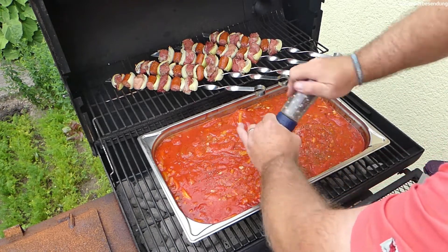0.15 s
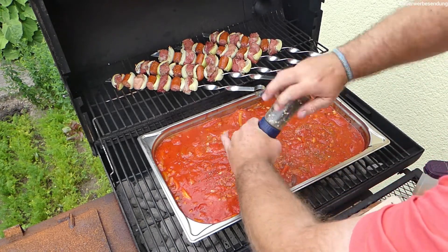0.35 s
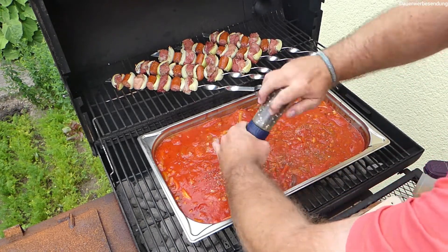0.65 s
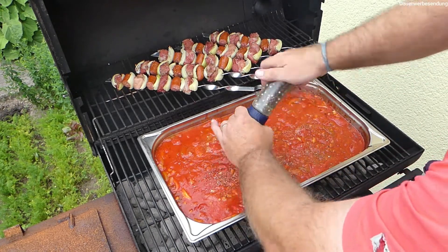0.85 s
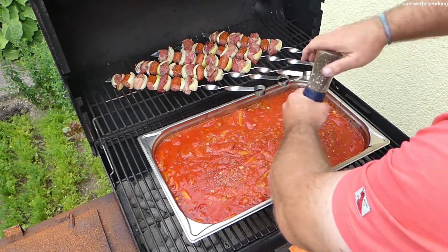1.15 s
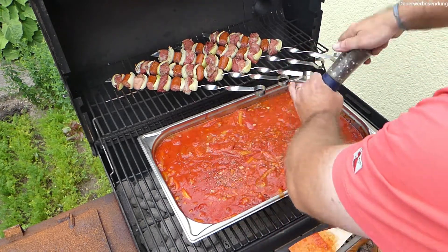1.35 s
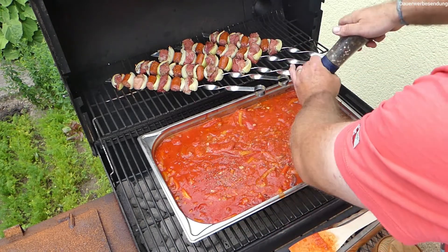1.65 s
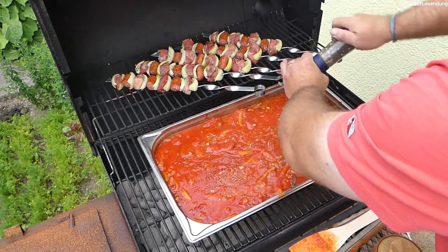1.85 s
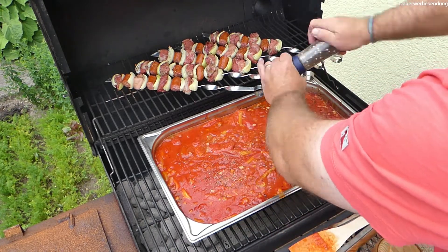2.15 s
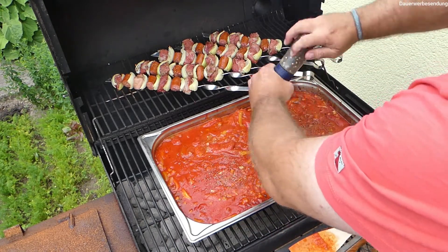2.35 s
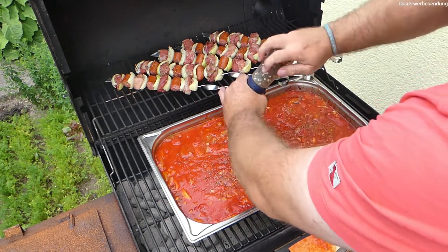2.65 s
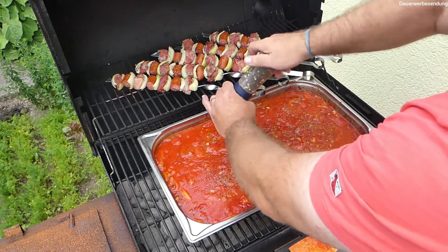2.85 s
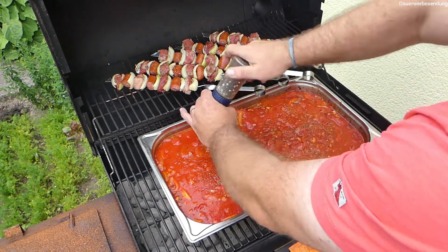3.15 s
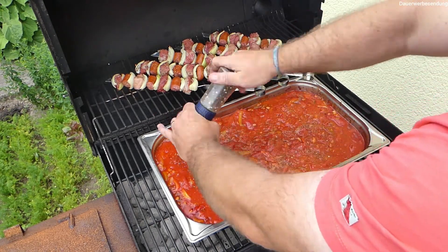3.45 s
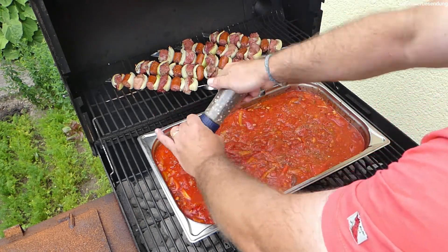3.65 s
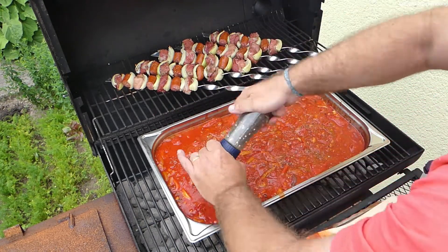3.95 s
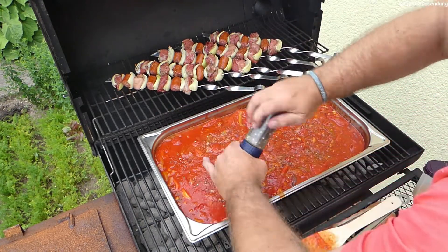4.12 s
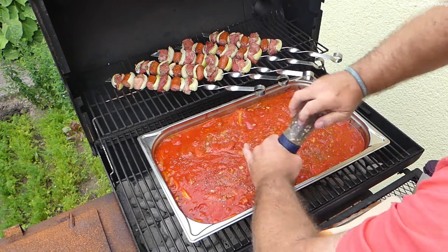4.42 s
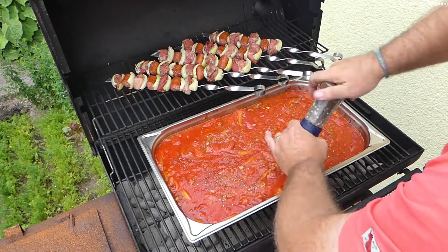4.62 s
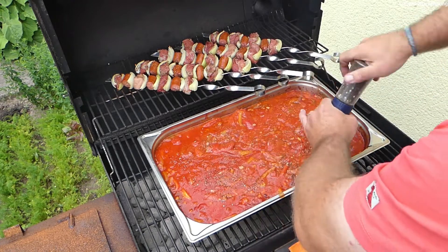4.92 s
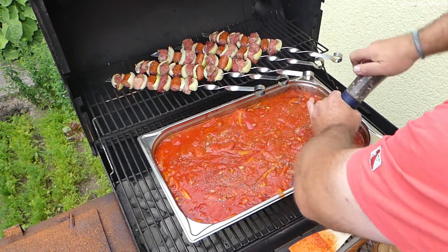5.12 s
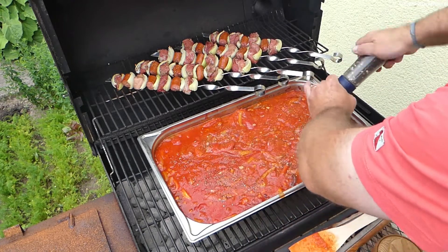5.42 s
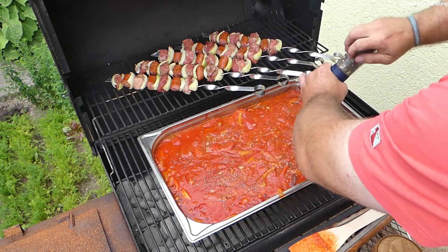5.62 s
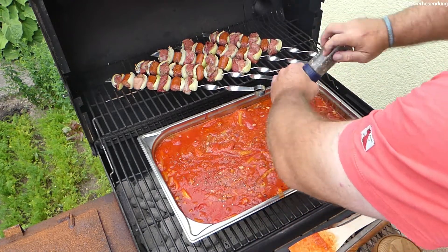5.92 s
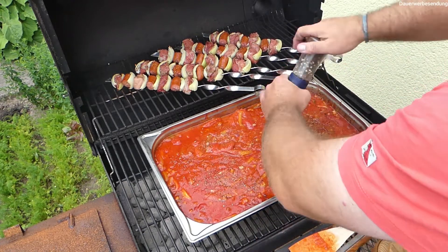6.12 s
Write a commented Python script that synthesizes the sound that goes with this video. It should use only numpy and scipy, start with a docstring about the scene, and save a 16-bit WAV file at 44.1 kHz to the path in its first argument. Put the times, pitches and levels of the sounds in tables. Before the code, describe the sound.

Steady run of about twenty-two quick pepper mill twists, each a dry scratchy burst just over a tenth of a second long, with uneven surges of grit. Crisp snaps and a hollow plastic crunch colour the stronger twists; small ticks and rattles fill the gaps. Close, nearly centred and dry, with a very short reflection from the steel hood, over a quiet outdoor bed of low rumble, hiss and breathy burner hum.

```python
"""At an outdoor grill, a hand pepper mill is twisted three to four times a second over a steel tray.
Corns crushed between the burrs make dense bright grit: noise gated by many small breaks, and ringing splinters.
Under load the plastic barrel crunches through its modes; single corns crack and the palm thuds on the cap.
Loose corns rattle between twists, faint whistles fall in the treble, and the steel hood answers briefly.
A gas burner hums softly, as resonant noise, under the rumble and hiss of the open air."""
import sys
import numpy as np
from scipy import signal
from scipy.fft import rfft, irfft, next_fast_len
from scipy.io import wavfile
from scipy.ndimage import uniform_filter1d, map_coordinates

SR = 44100
rng = np.random.default_rng(int(sys.argv[2]) if len(sys.argv) > 2 else 0)


def file_out(sig):
    """Save sig as 16-bit WAV at sys.argv[1]."""
    # one column per channel
    cols = np.atleast_2d(sig).T
    # limit, then scale
    lim = np.clip(cols, -1, 1)
    pcm = np.round(lim * 32767).astype(np.int16)
    wavfile.write(sys.argv[1], SR, pcm)


def linear_from_db(decibels):
    """Turn decibels (scalar or array-like) into linear amplitude factors; 0 gives 1."""
    return 10 ** (np.asarray(decibels, float) / 20)


N = 276939


def unit(x):
    """Scaled to rms 1."""
    return x / np.sqrt(np.mean(x ** 2) + 1e-20)


def along(points, hz):
    """Reads (Hz, value) points at any frequency, on a log axis."""
    point_hz, value = np.transpose(points)
    return np.interp(np.log(hz + 1), np.log(point_hz + 1), value)


def curves(rows):
    """One value per sample for each column after the time."""
    s, *columns = np.transpose(sorted(rows))
    return [np.interp(np.arange(N) / SR, s, column) for column in columns]


def wobble(rate):
    """A smooth random curve, rate knots a second."""
    knots = rng.standard_normal(N // 16)
    return map_coordinates(knots, [np.arange(N) * rate / SR])


def filtered(x, response):
    """x times a complex response of frequency."""
    size = next_fast_len(N + SR // 2)
    spectrum = rfft(x, size) * response(np.fft.rfftfreq(size, 1 / SR))
    return irfft(spectrum, size)[..., :N]


def resonant(modes):
    """Causal response of a sum of resonances (Hz, width Hz, dB), alternating in sign."""
    def response(hz):
        total = 0
        for k, (centre, width, db) in enumerate(modes):
            mode = 1j * hz * width / (centre * centre - hz * hz + 1j * hz * width)
            total = total + (-1) ** k * linear_from_db(db) * mode
        return total
    return response


def grinding():
    """Grit follows the twist; the same uneven feed of corns shakes the barrel as load rises."""
    # pitches where splinters ring: centre_hz, spread_octaves, level_db (relative)
    splinter_bands = [(4310, 0.13, -8), (5630, 0.064, -4.5), (7640, 0.094, -4.5), (9200, 0.087, -1),
                      (11350, 0.12, -7)]
    # the burrs stick on a hard corn just before it cracks: time_s, drop_db
    sticking = [(3.302, 12), (4.222, 4), (5.108, 11)]
    stall_s = .008  # half-width of a dip, to 1/e of its drop in dB
    grit_level, crunch_level, note_hz = effort()

    feed_db = 1.0 * wobble(45) + 1.1 * wobble(130)
    t = np.arange(N) / SR
    for s, drop_db in sticking:
        feed_db = feed_db - drop_db * np.exp(-((t - s) / stall_s) ** 2)

    breaks = fractures(count=5000, spread_db=3, t60=0.011, bed=1.0)
    rub = unit(burrs(patchy(breaks, 2.38, size=12)))
    chips = np.zeros(N)
    for hz, octaves, db in splinter_bands:
        chips += linear_from_db(db) * splinters(2500, np.full(N, hz), octaves, cycles=5.1, spread_db=4)
    grit = unit(0.93 * rub + 0.48 * unit(chips))

    breaks = fractures(count=2000, spread_db=2.5, t60=0.012, bed=1.0)
    shake = unit(barrel(patchy(breaks, 3.5, size=24)))
    # the grip retunes the barrel
    note = splinters(3000, note_hz, octaves=0.045, cycles=4.5, spread_db=2)
    crunch = unit(0.84 * shake + 0.57 * note)
    return linear_from_db(feed_db) * (grit_level * grit + crunch_level * crunch)


def effort():
    """Grit, crunch and barrel note: each twist opens fast, carries its surges and load, and dies away."""
    # twists of the wrist: start_s, length_s, attack_s (per 10 dB), steady grit_db, steady crunch_db
    twist_rows = [(0.086, 0.137, 0.004, -30.4, -51.2), (0.385, 0.113, 0.015, -30.2, -51.2),
                  (0.658, 0.109, 0.006, -22.1, -33.1), (0.948, 0.123, 0.009, -27.2, -34.7),
                  (1.217, 0.118, 0.024, -26.1, -45.2), (1.48, 0.137, 0.006, -26.4, -33.4),
                  (1.803, 0.104, 0.014, -26.3, -37.2), (2.077, 0.117, 0.015, -24.5, -37.0),
                  (2.365, 0.137, 0.004, -24.7, -32.4), (2.686, 0.109, 0.011, -23.6, -34.8),
                  (2.971, 0.107, 0.006, -24.7, -32.1), (3.237, 0.121, 0.022, -30.4, -50.6),
                  (3.589, 0.096, 0.015, -29.2, -45.8), (3.848, 0.113, 0.007, -23.2, -38.3),
                  (4.143, 0.115, 0.006, -25.9, -34.9), (4.44, 0.108, 0.013, -25.3, -51.2),
                  (4.707, 0.155, 0.01, -27.2, -42.2), (4.994, 0.168, 0.037, -26.2, -42.5),
                  (5.319, 0.138, 0.015, -28.7, -51.2), (5.634, 0.115, 0.016, -25.2, -51.2),
                  (5.899, 0.123, 0.011, -22.9, -34.1), (6.191, 0.12, 0.019, -21.8, -37.4)]
    # a clump of corns goes through the burrs: time_s, grit_db (at full twist), slope_s (per 10 dB each side)
    surge_rows = [(0.123, -12.8, 0.024), (0.183, -15.6, 0.016), (0.399, -18.5, 0.017),
                  (0.469, -17.8, 0.023), (0.679, -17.1, 0.037), (0.762, -18.1, 0.015),
                  (0.976, -13.9, 0.031), (1.053, -17.4, 0.022), (1.228, -18.0, 0.023),
                  (1.276, -15.5, 0.033), (1.322, -15.8, 0.023), (1.532, -13.1, 0.042),
                  (1.604, -18.5, 0.022), (1.816, -20.7, 0.026), (1.897, -16.1, 0.021),
                  (2.103, -12.9, 0.036), (2.18, -18.8, 0.021), (2.382, -14.8, 0.034), (2.441, -19.8, 0.026),
                  (2.492, -19.5, 0.023), (2.694, -14.0, 0.018), (2.745, -20.3, 0.026),
                  (2.997, -19.9, 0.034), (3.066, -18.6, 0.033), (3.269, -16.6, 0.026),
                  (3.325, -15.9, 0.033), (3.647, -20.6, 0.025), (3.861, -15.2, 0.022),
                  (3.913, -17.5, 0.027), (4.156, -14.9, 0.035), (4.235, -19.9, 0.03), (4.447, -18.0, 0.031),
                  (4.531, -17.1, 0.022), (4.732, -14.2, 0.029), (4.779, -18.7, 0.024),
                  (4.836, -21.8, 0.032), (5.081, -14.2, 0.047), (5.154, -22.8, 0.02), (5.353, -11.9, 0.033),
                  (5.432, -17.5, 0.018), (5.649, -13.7, 0.03), (5.707, -17.0, 0.021), (5.924, -13.2, 0.03),
                  (6.005, -18.6, 0.03), (6.242, -19.1, 0.036)]
    # heaviest load of each twist on the barrel:
    # time_s, crunch_db (at full twist), rise_s and fall_s (per 10 dB), note_hz
    load_rows = [(0.185, -26.8, 0.092, 0.026, 1250), (0.469, -27.7, 0.066, 0.029, 1500),
                 (0.741, -28.9, 0.01, 0.021, 2100), (1.036, -29.2, 0.032, 0.08, 2200),
                 (1.347, -25.8, 0.098, 0.049, 1670), (1.602, -32.8, 0.066, 0.08, 2020),
                 (1.867, -30.7, 0.101, 0.08, 1930), (2.141, -27.1, 0.112, 0.069, 2380),
                 (2.466, -22, 0.02, 0.018, 2340), (2.752, -27.7, 0.096, 0.026, 2190),
                 (3.042, -29.3, 0.01, 0.08, 2070), (3.32, -26, 0.04, 0.051, 1950),
                 (3.627, -26.6, 0.014, 0.041, 2240), (3.922, -25.5, 0.025, 0.062, 2070),
                 (4.236, -21.4, 0.015, 0.006, 1400), (4.496, -27, 0.037, 0.08, 1700),
                 (4.8, -31, 0.112, 0.048, 1300), (5.113, -24.5, 0.031, 0.031, 1670),
                 (5.408, -29.8, 0.11, 0.08, 1900), (5.695, -23.5, 0.083, 0.03, 2230),
                 (5.978, -28.3, 0.014, 0.015, 2090), (6.268, -25.5, 0.044, 0.033, 1700)]
    # loose corns rattle as the hand regrips: time_s, grit_db, rise_s and fall_s (per 10 dB)
    rattle_rows = [(0.013, -43.5, 0.022, 0.018), (0.256, -25.3, 0.024, 0.018), (0.54, -35.4, 0.03, 0.036),
                   (0.638, -37.4, 0.021, 0.021), (0.848, -33.3, 0.054, 0.049), (0.906, -38.5, 0.029, 0.03),
                   (0.937, -36.8, 0.015, 0.01), (1.131, -21.2, 0.021, 0.03), (1.389, -23.3, 0.03, 0.018),
                   (1.457, -28.3, 0.015, 0.024), (1.681, -32.4, 0.024, 0.042), (1.78, -33.5, 0.04, 0.01),
                   (2.248, -36.2, 0.032, 0.046), (2.909, -35.3, 0.034, 0.024), (2.94, -33.1, 0.013, 0.021),
                   (3.143, -35.5, 0.01, 0.039), (3.428, -30.1, 0.011, 0.033), (3.5, -35.9, 0.018, 0.029),
                   (3.719, -38.7, 0.05, 0.028), (3.773, -34.8, 0.013, 0.018), (3.997, -38.3, 0.02, 0.025),
                   (4.111, -41.6, 0.015, 0.021), (4.384, -29.6, 0.035, 0.023), (4.613, -32.9, 0.019, 0.016),
                   (4.95, -36.3, 0.03, 0.04), (5.26, -35.0, 0.013, 0.03), (5.302, -34.8, 0.019, 0.02),
                   (5.489, -33.6, 0.02, 0.029), (5.562, -35.7, 0.023, 0.028), (5.605, -32.0, 0.025, 0.02),
                   (5.84, -37.4, 0.04, 0.02), (6.08, -38.5, 0.03, 0.029), (6.116, -39.0, 0.016, 0.022)]
    release_s = .0225  # per 10 dB after a twist
    rest_db, rattle_crunch_db = -49, -18  # grit at rest; crunch over loose grit
    bite_hz, loose_hz, loosen_s = 2200, 1600, .09  # note as the grip closes, once it opens; time to open

    start, length, attack, grit_db, crunch_db = np.transpose(twist_rows)
    full, never = np.zeros(len(start)), np.full(len(start), np.inf)
    opening = peaked(start, full, attack, never)
    closing = peaked(start + length, full, never, full + release_s)
    turning = opening * closing
    strongest = turning.max(axis=0)

    surge_s, surge_db, slope = np.transpose(surge_rows)
    load_s, load_db, rise, fall, load_hz = np.transpose(load_rows)
    surges = peaked(surge_s, surge_db, slope, slope).sum(axis=0)
    loads = peaked(load_s, load_db, rise, fall).sum(axis=0)
    loose = peaked(*np.transpose(rattle_rows)).sum(axis=0) + linear_from_db(rest_db) ** 2
    grit = linear_from_db(grit_db) ** 2 @ turning + strongest * surges + loose
    crunch = linear_from_db(crunch_db) ** 2 @ turning + strongest * loads + loose * linear_from_db(rattle_crunch_db) ** 2

    closed = [(s, bite_hz) for s in start]
    opened = [(s, loose_hz) for s in start + length + loosen_s]
    note_hz, = curves([*zip(load_s, load_hz), *closed, *opened])
    ms = np.arange(N) / SR * 1000
    grit_level, crunch_level = [np.interp(ms, np.arange(len(p)), np.sqrt(p)) for p in (grit, crunch)]
    return grit_level, crunch_level, note_hz


def peaked(s, db, rise, fall):
    """Power of one swell a row, straight in dB up to its peak and down again; rows x milliseconds."""
    late = np.arange(0, N / SR + .001, .001) - np.c_[s]
    down = np.maximum(-late / np.c_[rise], late / np.c_[fall])
    return linear_from_db(np.c_[db] - 10 * down) ** 2


def fractures(count, spread_db, t60, bed):
    """Noise gated by many small breaks of very unequal size, each dying fast, over a bed of rubbing."""
    when, size = rng.random(count), rng.exponential(size=count)
    strength = linear_from_db(spread_db * np.minimum(size, 5))  # rare giants are capped
    starts = np.bincount((when * N).astype(int), strength, N)
    t = np.arange(SR // 20) / SR
    gate = signal.fftconvolve(starts, linear_from_db(-60 * t / t60))[:N]
    return (bed + unit(gate)) * rng.standard_normal(N)


def patchy(x, depth_db, size):
    """Random gain patches over time and pitch: no two moments share one colour."""
    z = signal.stft(x, nperseg=128)[2]
    field = uniform_filter1d(rng.standard_normal(z.shape), 3, 0)  # across pitch
    field = uniform_filter1d(field, size, 1)  # across time
    return signal.istft(z * linear_from_db(depth_db * unit(field)), nperseg=128)[1][:N]


def splinters(count, centre_hz, octaves, cycles, spread_db):
    """Splinters of unequal size, each ringing briefly at its own pitch around a centre."""
    start = rng.integers(0, N, count)
    detune, size = rng.standard_normal(count), rng.exponential(size=count)
    hz = np.clip(centre_hz[start] * np.exp2(octaves * detune), 300, SR / 2.5)
    return unit(rings(start, hz, cycles, linear_from_db(spread_db * np.minimum(size, 4))))


def rings(start, hz, cycles, size):
    """Sum of short sines, one row per splinter, each fading by 1/e over the given cycles."""
    k = np.arange(160)
    turn = hz[:, None] * k / SR
    wave = size[:, None] * np.exp(-turn / cycles) * np.sin(2 * np.pi * turn)
    return np.bincount((start[:, None] + k).ravel(), wave.ravel(), N + len(k))[:N]


def burrs(x):
    """Colour of the grinding burrs."""
    # spectrum of the burrs: pitch_hz, level_db (relative, per Hz)
    colour = [(300, -75), (1650, -40.5), (2800, -18), (3240, -13), (3560, -9.5), (4210, -8), (4500, -6),
              (6200, -3.5), (6820, -4), (8930, -0.5), (11300, -5), (13800, -9), (15200, -13.5),
              (16000, -68)]
    return filtered(x, lambda hz: linear_from_db(along(colour, hz)))


def barrel(x):
    """The plastic barrel's modes; it is too small to radiate bass."""
    # modes of the barrel: centre_hz, width_hz, level_db (relative)
    modes = [(614, 370, -14), (1138, 240, -6), (1750, 450, -8.5), (2200, 216, -2.5), (2740, 520, -6)]
    return filtered(x, lambda hz: resonant(modes)(hz) * (1j * hz / (300 + 1j * hz)) ** 2)


def cracks():
    """Each crack is a broad burst through the burrs, a ring at its own pitch and a knock in the barrel."""
    # corns that crack or drop: time_s, level_db (relative), knock_db (over that level), ring pitch_hz
    crack_rows = [(0.084, -3, -21, 9830), (0.1804, -5, -20, 5720), (0.3277, -16, -35, 9000),
                  (0.396, -6, -21, 7600), (0.4525, -3, -9, 9900), (0.475, -8, -6, 6000),
                  (0.629, -13, -29, 11600), (0.6566, 0, -34, 9000), (0.7562, -5, -26, 8700),
                  (0.816, -5, -42, 9000), (0.854, -11, -34, 9970), (0.8949, -16, -27, 9400),
                  (0.9592, 0, -15, 8860), (1.0291, -6.5, -0.5, 8700), (1.1553, -7, -29, 9370),
                  (1.2221, 0, -35, 9060), (1.275, -6, -8, 6000), (1.4525, -9, -28, 8200),
                  (1.4775, -9, -17, 9200), (1.5264, -1, -30, 6360), (1.806, -2, -24, 8970),
                  (1.986, -18, -24, 9000), (2.0754, -5, -25, 8600), (2.3695, -6, -19, 9360),
                  (2.4, -2, -25, 7000), (2.4636, 0.5, -3.5, 3460), (2.6873, -0.5, -21, 8870),
                  (2.7369, -5, -11, 7700), (2.943, -12, -24, 9050), (2.9706, -8, -15, 9860),
                  (3.0584, -4, -18, 7930), (3.1445, -11.5, -20, 8700), (3.163, -22, -3, 5000),
                  (3.2191, -11.5, -24, 9400), (3.3025, -12, -30, 11000), (3.3127, 2, -5, 8920),
                  (3.4234, -11, -33, 10700), (3.495, -12, -25, 9070), (3.845, -16, -26, 5420),
                  (3.8581, 0, -32, 9540), (4.0008, -13, -34, 7960), (4.058, -22, -3, 8000),
                  (4.0857, -16, -27, 8340), (4.1089, -13, -20, 5500), (4.141, -6, -25, 9900),
                  (4.2308, 1, 0, 4133), (4.3772, -5.5, -38, 8750), (4.4223, -15, -36, 5320),
                  (4.4372, -8.5, -31, 9300), (4.524, 0.5, -24, 5650), (4.6155, -17, -31, 9600),
                  (4.716, -1, -31, 9200), (4.781, 0, -25, 8000), (4.882, -22, 0, 5000),
                  (5.0136, -2, -28, 9250), (5.116, 0, -7.5, 5340), (5.146, -2, -28, 9100),
                  (5.2563, -18, -26, 5680), (5.329, -2, -20, 9040), (5.355, 2, -30, 9000),
                  (5.4256, -2, -21, 8820), (5.453, -7, -6, 4000), (5.6332, -2, -19, 8920),
                  (5.91, -5, -18, 9760), (6.1403, -15, -28, 5760), (6.263, -6, -3, 5000)]
    snap, ring, knock = np.zeros((3, N + SR))
    t = np.arange(SR // 20) / SR
    for s, db, knock_db, ring_hz in crack_rows + strays():
        burst = rng.standard_normal((3, len(t)))
        first = round(s * SR)
        at = slice(first, first + len(t))
        # narrow noise at the ring's pitch
        tone = uniform_filter1d(burst[2], size=20) * np.sin(2 * np.pi * ring_hz * t)
        # each part falls 60 dB in the seconds given
        snap[at] += linear_from_db(db - 8.5 - 60 * t / 0.015) * burst[0]
        ring[at] += linear_from_db(db + 2.5 - 60 * t / 0.02) * tone
        knock[at] += linear_from_db(db + knock_db + 8.5 - 60 * t / 0.0085) * burst[1]
    return burrs(snap[:N]) + ring[:N] + barrel(knock[:N])


def strays():
    """Stray corns dropping at chance moments, as rows like those of the cracks."""
    count, level_db, spread_db = 70, -25, 4
    knock_db, ring_hz, spread_octaves = -27, 8800, .2
    z, s = rng.standard_normal((count, 2)), rng.random(count) * N / SR
    return [(when, level_db + spread_db * a, knock_db, ring_hz * 2 ** (spread_octaves * b))
            for when, (a, b) in zip(s, z)]


def thuds():
    """A dull, short ring, a decaying sine, for each landing of the palm."""
    # the palm lands on the cap of the mill: time_s, level_db (before the attack), pitch_hz
    landings = [(.452, -29, 650), (.568, -39, 400), (.653, -36, 400), (.935, -30, 503), (1.476, -30, 573),
                (2.059, -35, 400), (2.356, -34, 400), (5.308, -29, 519)]
    t60_s, attack_s = .04, .001
    out, t = np.zeros(N + SR), np.arange(SR // 10) / SR
    for s, db, hz in landings:
        envelope = linear_from_db(db - 60 * t / t60_s) * (1 - np.exp(-t / attack_s))
        out[round(s * SR):][:len(t)] += envelope * np.sin(2 * np.pi * hz * t)
    return out[:N]


def whistles():
    """Faint falling sine tones, fading in and out."""
    # thin whistles in the treble: start_s, length_s, from_hz, to_hz, level_db
    glides = [(2.285, .07, 12500, 11500, -61), (2.575, .08, 12630, 12150, -60)]
    fade_s = .012
    out, t = np.zeros(N), np.arange(N) / SR
    for s, length, from_hz, to_hz, db in glides:
        end = s + length
        hz = np.interp(t, [s, end], [from_hz, to_hz])
        fade = np.interp(t, [s - fade_s, s, end, end + fade_s], [0, 1, 1, 0])
        out += fade * linear_from_db(db) * np.sin(2 * np.pi * np.cumsum(hz) / SR)
    return out


def hood(x):
    """Short answer of the open steel hood: a decaying noise tail, different at each side."""
    # decay of hood and tray: pitch_hz, t60_s
    decay = [(300, 0.046), (3000, 0.046), (12000, 0.029)]
    hz, t, z = signal.stft(rng.standard_normal((2, SR // 4)), SR, nperseg=256)
    fall = linear_from_db(-60 * t / along(decay, hz)[:, None])
    tail = signal.istft(z * fall, SR, nperseg=256)[1]
    late = np.pad(x, (60, 0))[None]  # 60 samples of delay
    return signal.fftconvolve(late, tail / np.linalg.norm(tail[0]), axes=1)[:, :N]


def outdoors():
    """Far rumble and hiss, nearly alike on both sides, and the burner's breathy hum."""
    # drift of burner and air: time_s, hum_db, air_db (relative)
    drift = [(0.0, -57, -58), (0.37, -54, -57), (1.22, -52, -56), (1.89, -55, -59), (2.95, -54, -58),
             (3.2, -52, -58), (3.5, -48.5, -59), (3.85, -49, -59), (4.1, -49, -62), (4.27, -55, -63),
             (4.65, -49, -60), (5.1, -50, -58), (5.4, -56, -60), (5.75, -58, -65), (6.28, -54, -62)]
    # spectrum of rumble and hiss: pitch_hz, level_db (relative, per Hz)
    air_colour = [(15, -44), (25, -3), (100, -2), (200, -4), (309, -2.5), (503, -1.5), (1190, -5.5),
                  (1370, -13.5), (2480, -12), (3250, -15), (4370, -11.5), (7110, -14.5), (9070, -10.5),
                  (14400, -18), (16000, -24)]
    # width of the open air: pitch_hz, side_over_mid_db
    air_width = [(60, -14), (240, -11), (950, -14), (3770, -8), (15000, -12)]
    # burner tube, its response applied twice: centre_hz, width_hz, level_db (relative, each pass)
    tube = [(129, 36, -4), (324.8, 55, 0)]
    hum_db, air_db = curves(drift)
    mid, side = filtered(rng.standard_normal((2, N)),
                         lambda hz: linear_from_db(along(air_colour, hz) + np.array([0 * hz, along(air_width, hz)])))
    air = unit(np.array([mid + side, mid - side]))
    hum = unit(filtered(rng.standard_normal(N), lambda hz: resonant(tube)(hz) ** 2))
    air = linear_from_db(air_db + 12.8 + 1.3 * wobble(7)) * air
    hum = linear_from_db(hum_db + 1.2 * wobble(5.2)) * hum
    return (air + hum) * linear_from_db([[-.4], [.4]])  # leans slightly right


def scene():
    """The mill close and nearly centred, too small for deep bass; its echo and the air around."""
    mill = grinding() + cracks() + thuds() + whistles()
    mill = filtered(mill, lambda hz: (1j * hz / (150 + 1j * hz)) ** 2)
    return mill * linear_from_db([[-.25], [.25]]) + linear_from_db(-16.5) * hood(mill) + outdoors()


def band_limit(x):
    """A steep low-pass at the top of the band."""
    return signal.sosfilt(signal.butter(12, 16510, fs=SR, output="sos"), x)


def record(dry):
    """The microphone cuts the deep bass, and peaks beyond full scale clip."""
    heard = filtered(dry, lambda hz: (1j * hz / (70 + 1j * hz)) ** 2)
    return band_limit(np.clip(heard, -1, 1))


dry = scene()
out = record(dry)
file_out(out)
```